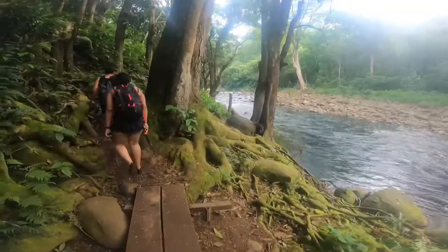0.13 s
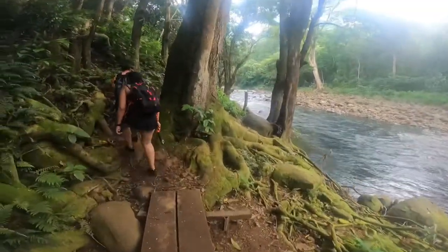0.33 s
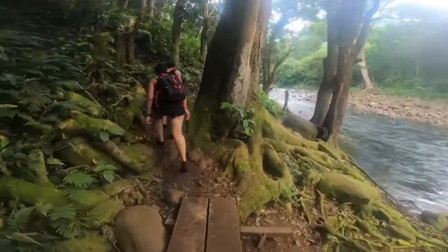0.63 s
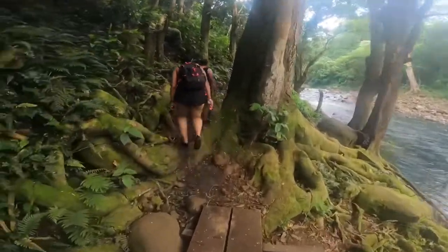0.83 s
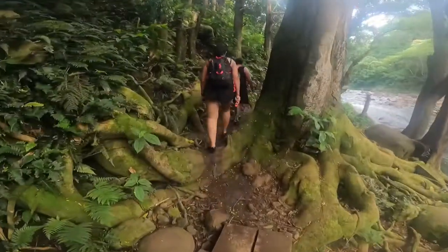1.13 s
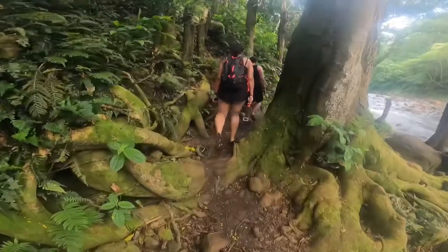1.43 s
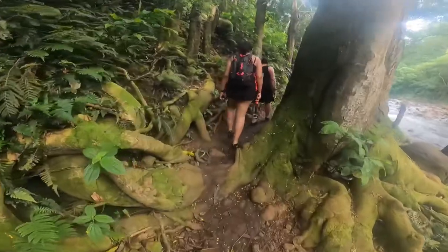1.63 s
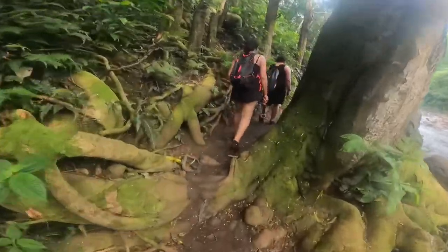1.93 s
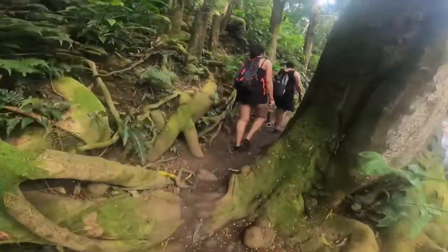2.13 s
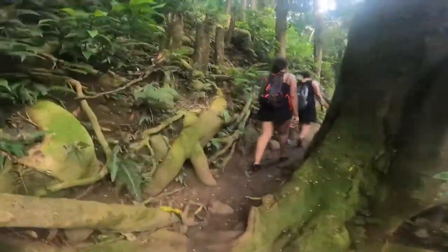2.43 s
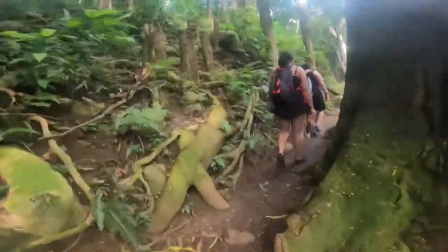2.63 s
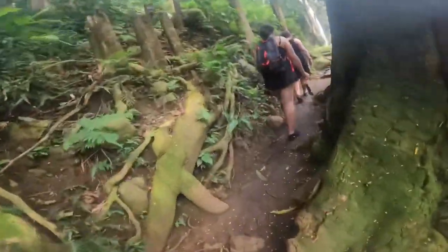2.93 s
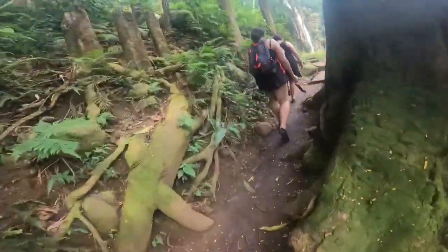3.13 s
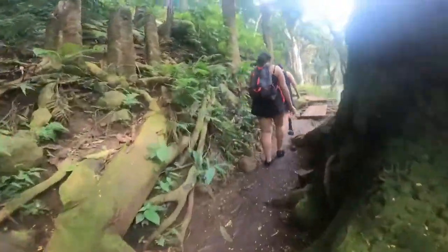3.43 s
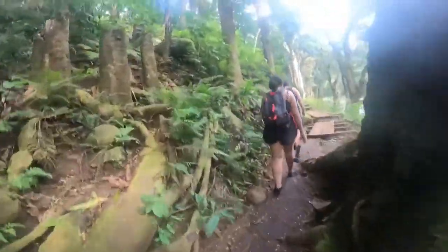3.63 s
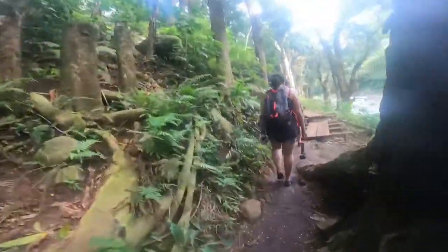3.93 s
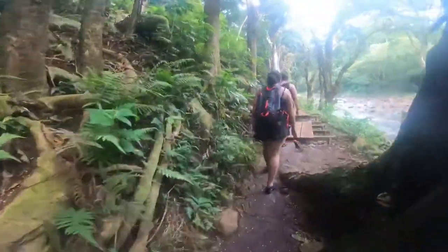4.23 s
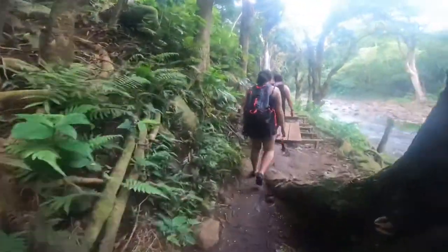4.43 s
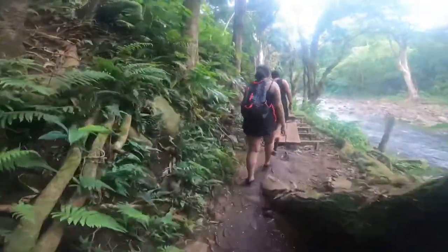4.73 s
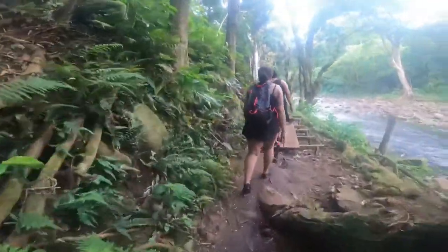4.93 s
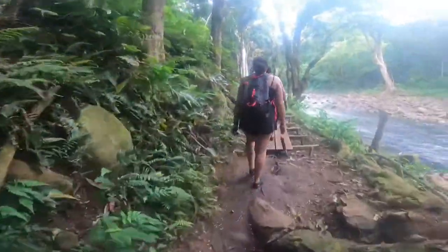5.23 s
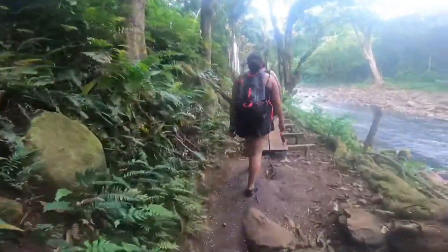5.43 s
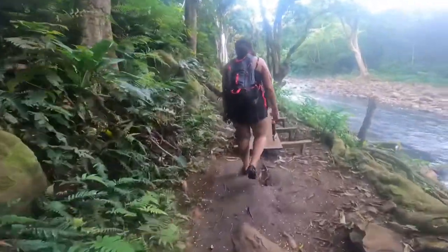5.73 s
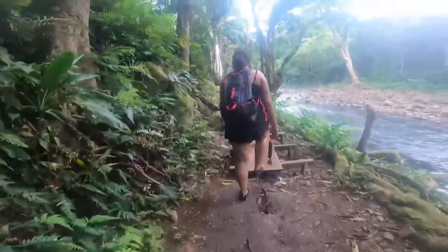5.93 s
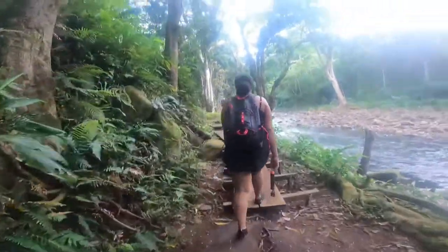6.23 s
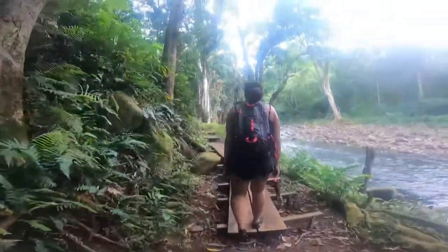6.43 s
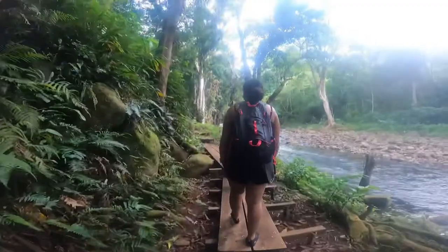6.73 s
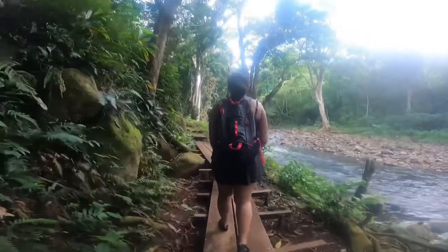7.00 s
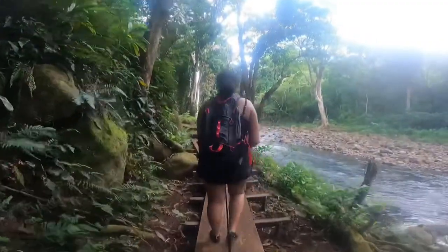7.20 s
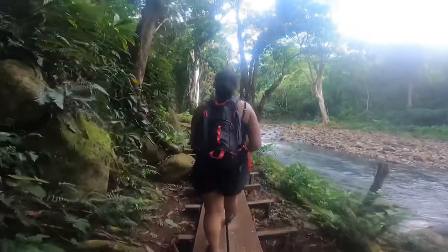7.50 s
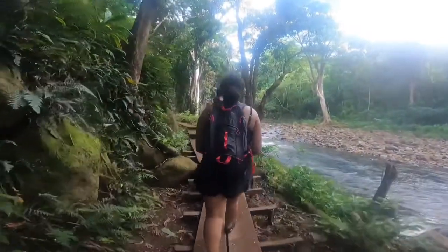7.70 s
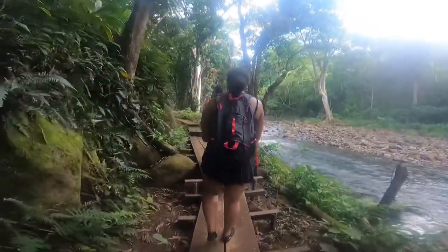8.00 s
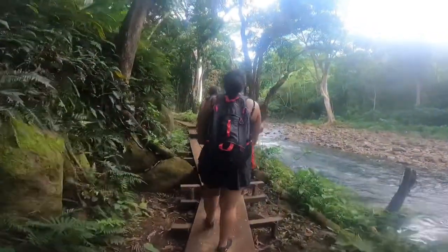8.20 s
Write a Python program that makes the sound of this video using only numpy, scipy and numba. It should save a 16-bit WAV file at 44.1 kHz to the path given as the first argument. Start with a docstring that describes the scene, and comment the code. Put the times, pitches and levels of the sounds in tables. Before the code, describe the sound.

Dull booming footfalls, gritty scrapes and dry clicks of swaying gear over the constant hollow rush of a shallow river, heard through a closed case.

```python
"""Footsteps to a riverside boardwalk, from a carried camera

A hiker walks a dirt path up to a plank boardwalk beside a rushing shallow river, camera in a closed case.
Each footfall jolts the mount, which booms near 120 Hz, and scuffs for as long as the contact lasts.
Gear rubs, clicks, crackles, tinks and squeaks; the deep bass of handling never stops.
The river, noise with splashes and wavering strands, and the scuffs pass the hollow resonances of the case."""
import sys
import numpy as np
from scipy import signal
from scipy.fft import rfft, irfft
from scipy.io import wavfile
from numba import njit

SR = 44100
rng = np.random.default_rng(int(sys.argv[2]) if len(sys.argv) > 2 else 0)


def generate_wav(signal):
    """Clip the signal to [-1, 1] and save it as 16-bit WAV at the path in sys.argv[1]."""
    frames = np.transpose(np.atleast_2d(signal))
    scaled = np.clip(frames, -1, 1) * 32767
    pcm = np.round(scaled).astype(np.int16)
    wavfile.write(sys.argv[1], SR, pcm)


N = 368676
TIME = np.arange(N) / SR
FREQS = np.maximum(np.fft.rfftfreq(N, 1 / SR), 1)

# Footfalls, some landing in two contacts, heel and toe. Each row: start in seconds, length of contact in
# seconds, boom in dB, boom t60 in seconds, boom pitch in Hz, jolt in dB, scuff body in dB, scuff grit in dB.
STEPS = [(0.168, 0.028, -27, 0.17, 110, -26, -48, -47), (0.265, 0.026, -29, 0.063, 116, -19, -36, -38.5),
         (0.325, 0.04, -36.5, 0.087, 113, -14, -67, -45), (0.677, 0.054, -30, 0.18, 124.4, -16, -37, -43.5),
         (1.307, 0.0202, -9, 0.2, 122.6, -18, -20.5, -36), (1.883, 0.031, -24, 0.11, 116.5, -28, -29, -33),
         (2.456, 0.041, -8.5, 0.29, 119.7, -10.5, -32.5, -48), (2.549, 0.05, -18, 0.21, 116, -10, -19, -22),
         (2.603, 0.045, -11, 0.11, 117, -9.5, -19, -28), (2.8, 0.068, -16, 0.18, 124.7, -28, -31, -36.5),
         (2.895, 0.067, -11, 0.25, 123.6, -36, -31.5, -38),
         (3.23, 0.03, -13, 0.1, 119.4, -11.5, -22.5, -31.5),
         (3.263, 0.017, -15, 0.24, 119.5, -3.5, -18, -32.5),
         (3.78, 0.057, -13, 0.092, 121, -13, -22.5, -30.5), (3.96, 0.088, -31.5, 0.19, 123, -42, -44, -61),
         (4.415, 0.05, -28, 0.41, 119.4, -12, -38.5, -50), (4.566, 0.025, -26, 0.094, 108.5, -42, -45, -34),
         (4.838, 0.031, -8.5, 0.16, 110.3, -3.5, -25, -41),
         (4.931, 0.055, -16.5, 0.45, 123.3, -17, -33, -43.5),
         (5.421, 0.062, -24, 0.19, 129, -23.5, -37.5, -34),
         (5.747, 0.02, -14.5, 0.049, 122, -18, -25.5, -35),
         (5.771, 0.043, -13, 0.26, 122.4, -26, -26.5, -30),
         (6.186, 0.075, -20, 0.48, 122.3, -29, -27, -32.5), (6.423, 0.067, -25, 0.51, 114, -31, -32.5, -39),
         (6.733, 0.07, -22.5, 0.34, 116, -34, -30.5, -35), (7.016, 0.028, -22, 0.2, 117.4, -14.5, -27, -37),
         (7.073, 0.035, -24, 0.89, 116.8, -19, -29, -42), (7.333, 0.091, -16, 0.46, 115.7, -40, -46, -69),
         (7.5, 0.053, -31.5, 0.33, 120.6, -45, -47, -52), (7.831, 0.032, -30.5, 0.27, 116, -23, -39, -49),
         (8.282, 0.096, -18, 0.48, 115.3, -19, -27, -35.5)]
# Colour of the fine grit underfoot. Each row: frequency in Hz, relative level in dB per Hz.
GRIT_COLOUR = [(200, -30.5), (450, -10), (760, 3), (980, -2), (1150, -8.5), (1400, -2.5), (1900, -2),
               (2500, -10.5), (3300, -25), (4200, -26), (7200, -36.5), (8300, -55), (9500, -64)]


def thumps(waver=0.025, uneven_db=0.46, loaded_share=0.73, sag_hz=8.4, settle_s=0.033):
    """The weight comes on, the mount swings up and rings out; it starts flat and the grip bends its pitch."""
    out = np.zeros(N)
    grip = 1 + waver * drift(rate_hz=25.0)
    for s, length, boom_db, t60, boom_hz, *_ in STEPS:
        span = slice(int(s * SR), int(s * SR) + SR // 2)
        t = TIME[span] - s
        rise = loaded_share * length  # seconds until the full weight is on the foot
        swell = np.sin(np.pi / 2 * np.clip(t / rise, 0, 1))
        decay = from_db(boom_db - 60 * np.maximum(t - rise, 0) / t60)
        hz = grip[span] * (boom_hz - sag_hz * np.exp(-t / settle_s))
        out[span] += swell * decay * np.sin(2 * np.pi * np.cumsum(hz) / SR)
    return out * from_db(uneven_db * drift(rate_hz=37))


def jolts(cycles=0.56, peak_share=0.539, jolt_hz=61.3, at_boom_db=-17, db_per_octave=14.5):
    """Each contact shoves the camera through one or two slow swings; so does each lurch of the hand."""
    # Lurches between footfalls. Each row: centre in seconds, level in dB, swing rate in Hz.
    lurches = [(2.679, -20, 20), (3.444, -21, 28), (3.514, -19, 17), (4.268, -15, 12), (4.381, -15, 29),
               (4.502, -18.5, 27), (5.288, -21, 10), (5.855, -15, 11.7)]
    shoves = []
    for s, length, boom_db, _, _, jolt_db, *_ in STEPS:
        # a step that booms louder also shoves faster
        swing_hz = jolt_hz * 2 ** ((boom_db - at_boom_db) / db_per_octave)
        shoves.append((s + peak_share * length, jolt_db, swing_hz))
    out = np.zeros(N)
    for s, level_db, hz in shoves + lurches:
        span = slice(max(int(s * SR) - SR // 5, 0), int(s * SR) + SR // 5)
        turn = (TIME[span] - s) * hz
        out[span] += from_db(level_db) * np.exp(-(turn / cycles) ** 2) * np.cos(2 * np.pi * turn)
    return out


def scuffs(sway_db, rough_db=0.2, stir_db=-19, stir_grit_db=-5, stir_spread_db=-2.5, groan_db=-7,
           groan_hz=390, groan_width_hz=45, groan_octaves=0.27, crunch_db=-2):
    """Steps and rubs are bursts of slips, a sliding hollow note under crunchy grit; swaying gear stirs too."""
    # Gear rubs between footfalls. Each row: start in seconds, length in seconds, body in dB, grit in dB.
    rubs = [(0.07, 0.021, -34.5, -35), (0.149, 0.053, -41.5, -40), (0.847, 0.14, -36, -41.5),
            (1.214, 0.15, -36.5, -41), (1.63, 0.072, -40.5, -45), (2.393, 0.034, -38, -43),
            (2.493, 0.02, -27, -30.5), (2.53, 0.02, -22, -28), (2.731, 0.057, -31, -40),
            (3.023, 0.22, -45.5, -44.5), (3.3, 0.044, -34.5, -43), (3.43, 0.037, -35.5, -54),
            (3.5, 0.11, -39, -53), (3.668, 0.023, -56, -40), (3.722, 0.068, -37.5, -49),
            (3.837, 0.037, -35, -44), (3.91, 0.044, -37.5, -52), (4.127, 0.059, -30, -38.5),
            (4.263, 0.064, -33.5, -43), (4.474, 0.068, -54, -39), (4.65, 0.15, -34.5, -40.5),
            (4.899, 0.027, -26, -36.5), (5.04, 0.086, -45, -62), (5.884, 0.013, -35.5, -47),
            (6.132, 0.055, -35, -41), (6.288, 0.054, -37, -39.5), (6.497, 0.084, -40.5, -60),
            (7.502, 0.094, -36, -49.5)]
    # Colour of the scuff's body. Each row: frequency in Hz, relative level in dB per Hz.
    body_colour = [(70, 8.5), (130, 3.5), (200, 0), (265, -2.5), (335, 3.5), (420, 5.5), (520, -4),
                   (640, -18.5), (900, -46.5), (4000, -86.5)]
    stir = from_db(sway_db + stir_db + stir_spread_db * np.minimum(drift(rate_hz=4.5), 2)) ** 2
    contacts = [(s, length, body_db, grit_db) for s, length, *_, body_db, grit_db in STEPS] + rubs
    body_rows = [(s, length, db) for s, length, db, _ in contacts]
    grit_rows = [(s, length, db) for s, length, _, db in contacts]
    body_power = stir + contact_power(body_rows, attack_s=0.0064, release_s=0.0095)
    grit_power = contact_power(grit_rows, attack_s=0.0094, release_s=0.0084)
    grit_power = grit_power + stir * from_db(stir_grit_db) ** 2

    sliding_hz = groan_hz * 2 ** (groan_octaves * drift(rate_hz=11.3))
    groan = moving_resonance(rng.standard_normal(N), sliding_hz, groan_width_hz)
    groan = rms_one(ring_at(groan, groan_hz, width_hz=230))
    groan = from_db(groan_db) * groan * from_db([[-1.5], [1.5]])  # a little louder on the right
    body = rms_one(case(coloured(grains(per_s=1100, spread_db=2.5), body_colour)))
    hollow = rms_one(body + groan)

    fine = rms_one(grains(per_s=2200, spread_db=0.0))
    crunches = rms_one(grains(per_s=190, spread_db=0.0))
    gritty = rms_one(case(coloured(fine + from_db(crunch_db) * crunches, GRIT_COLOUR)))
    pressure = from_db(rough_db * drift(rate_hz=42))
    return pressure * (np.sqrt(body_power) * hollow + np.sqrt(grit_power) * gritty)


def clicks(crumble_s=0.0026, crumble=0.068, uneven_db=5.0, focus_db_per_octave=16, crack_db=-5,
           crack_octaves=0.65, splinter_db=-8, splinter_low_hz=1700, splinter_top_hz=6000,
           dull_hz=6500, knock_lag_s=0.0012):
    """A dry snap and its brief crumbling ring nearby modes, with a hollow knock and a splintering edge."""
    # Clicks and knocks of shoes and gear, levels as peaks ahead of the dulling. Each row: start in seconds,
    # snap in dB, strongest ringing in Hz, hollow knock in dB, knock pitch in Hz, crisp edge in dB.
    snaps = [(0.404, -19.5, 1280, -68, 450, -61), (0.692, -24, 1140, -26, 430, -43),
             (1.3075, -15.5, 1250, -20, 450, -29.5), (1.324, -27, 1700, -22, 340, -38),
             (1.417, -27.5, 1130, -56, 450, -56), (2.551, -14, 1600, -28, 450, -40),
             (2.566, -14, 1250, -27, 500, -38), (2.578, -14, 1060, -16, 450, -38),
             (2.6126, -14, 1220, -19, 330, -36), (2.637, -24, 1500, -19, 400, -40),
             (2.817, -25.5, 1730, -36, 450, -44), (2.963, -23, 1410, -38, 450, -44),
             (3.099, -24, 1430, -39, 450, -39), (3.253, -35, 1800, -30, 450, -44),
             (3.265, -34, 1300, -14.5, 330, -45), (3.62, -23.5, 1120, -48, 400, -41),
             (3.662, -23, 1300, -50, 450, -37), (3.674, -25.5, 1220, -45, 450, -39),
             (3.737, -27, 1610, -44, 450, -33), (4.47, -21, 1380, -29, 550, -44),
             (4.477, -19.5, 1140, -35, 550, -38), (4.491, -15, 1310, -39, 520, -28),
             (4.561, -25, 1470, -46, 480, -44), (4.58, -23, 1110, -47, 480, -48),
             (4.595, -32, 1090, -44, 480, -50), (4.7757, -21, 1780, -30, 500, -26.5),
             (4.777, -14.5, 880, -17, 620, -31), (4.841, -41, 1110, -15, 453, -50),
             (4.852, -28, 1080, -10.5, 423, -40), (4.861, -28, 1060, -16, 440, -35),
             (4.912, -21, 1500, -36, 400, -33), (5.368, -16.5, 1070, -38, 450, -46),
             (5.39, -24, 1490, -41, 450, -44), (5.453, -16, 1250, -35, 450, -34),
             (5.664, -26.5, 1570, -53, 448, -33), (6.194, -19, 1550, -31, 550, -45),
             (6.229, -18, 1050, -30, 450, -48), (6.319, -27, 1610, -37, 450, -48),
             (7.034, -34, 1500, -30, 420, -34), (7.3336, -15.5, 1330, -31, 560, -51),
             (7.337, -21, 1000, -19.5, 570, -60)]
    # What the clicks ring with. Each row: frequency in Hz, relative strength in dB, t60 in seconds.
    modes = [(211, 9.5, 0.016), (350, -12.5, 0.023), (463, -1, 0.028), (536, -1.5, 0.016),
             (598, -5, 0.0096), (900, -3, 0.0078), (966, 4.5, 0.014), (1148, 2.5, 0.011), (1300, -5, 0.01),
             (1594, 0.5, 0.015), (1850, -2.5, 0.006)]
    t = TIME[:SR // 16]
    out = np.zeros((2, N))
    hz, mode_db, t60 = np.transpose(modes)[:, :, None]
    low = hz[:, 0] < 750  # these modes make the hollow knock
    opposed = (-1) ** np.arange(len(hz))[:, None]  # neighbouring modes swing in opposition
    tap = signal.unit_impulse(len(t))
    splinter = band_pass(tap, [splinter_low_hz, splinter_top_hz])
    edge = rms_one(crisp(tap)) + from_db(splinter_db) * rms_one(splinter)
    for s, peak_db, ring_hz, low_db, low_hz, edge_db in snaps:
        force = tap + crumble * rng.standard_normal(len(t)) * np.exp(-t / crumble_s)
        octaves_away = np.abs(np.log2(hz / np.where(low[:, None], low_hz, ring_hz)))
        # each microphone gets every mode with a strength of its own
        uneven = uneven_db * rng.standard_normal((2, len(hz), 1))
        strength = from_db(mode_db - focus_db_per_octave * octaves_away + uneven) * opposed
        rings = strength * from_db(-60 * t / t60) * np.sin(2 * np.pi * hz * t)
        crack = band_pass(tap, ring_hz * 2 ** (crack_octaves * np.array([-0.5, 0.5])))
        parts = [(rings[:, ~low].sum(axis=1), peak_db, 0),
                 (rings[:, low].sum(axis=1), low_db, knock_lag_s),
                 (crack[None], peak_db + crack_db, 0),
                 (edge[None], edge_db, 0)]
        for response, db, lag in parts:
            hit = signal.fftconvolve(response, force[None])[:, :len(t)]
            start = int((s + lag) * SR)
            out[:, start:start + len(t)] += from_db(db) * hit / np.abs(hit).max()
    return signal.sosfilt(signal.butter(4, dull_hz, fs=SR, output="sos"), out + 1e-18)


def crackles():
    """As gear flexes under a heavy step, runs of tiny snaps ring, a little different at each microphone."""
    # Each row: start in seconds, length in seconds, level in dB.
    runs = [(1.315, 0.024, -47), (2.555, 0.079, -42), (2.74, 0.14, -55), (2.882, 0.039, -44),
            (2.915, .05, -55), (3.24, 0.05, -57), (3.775, 0.048, -44.5), (4.911, 0.01, -37.5)]
    snaps = rms_one(crisp(coloured(grains(per_s=1000, spread_db=-1.5), GRIT_COLOUR)))
    return snaps * np.sqrt(contact_power(runs, attack_s=0.004, release_s=0.0072))


def soft_knock(start_s=5.572, level_db=-29.5, from_hz=1150, to_hz=110, drop_s=0.0016, peak_s=0.0038):
    """A few cycles that swell and die while sweeping down into the bass."""
    out = np.zeros(N)
    t = TIME[:SR // 16]
    hz = to_hz + (from_hz - to_hz) * np.exp(-t / drop_s)
    swell = t / peak_s * np.exp(1 - t / peak_s)
    start = int(start_s * SR)
    out[start:start + len(t)] = from_db(level_db) * swell * np.sin(2 * np.pi * np.cumsum(hz) / SR)
    return out


def tinks():
    """A small piece of metal, as of a zip pull, swings against the pack and rings in decaying modes."""
    # Each row: start in seconds, level in dB, to which the level of each mode is added.
    touches = [(0.729, -67), (.757, -77), (3.62, -60), (6.379, -64)]
    # Each row: frequency in Hz, relative level in dB, t60 in seconds.
    metal_modes = [(5700, 19, 0.034), (5360, 7, 0.022), (5820, 12, 0.043), (6230, 4, 0.029),
                   (7160, 4, 0.04), (8700, -17, .12)]
    out = np.zeros(N)
    t = TIME[:SR // 4]
    ring = sum(from_db(db - 60 * t / t60) * np.sin(2 * np.pi * hz * t) for hz, db, t60 in metal_modes)
    for s, level_db in touches:
        start = int(s * SR)
        out[start:start + len(t)] += from_db(level_db) * ring
    return out


def squeak(start_s=7.06, length_s=0.12, level_db=-49, from_hz=1850, to_hz=2000, width_hz=70):
    """Two surfaces of the gear slip and sing thinly for a moment, rising in pitch."""
    hz = np.interp(TIME, [start_s, start_s + length_s], [from_hz, to_hz])
    note = rms_one(narrow_note(hz, width_hz))
    return note * np.sqrt(contact_power([(start_s, length_s, level_db)], attack_s=0.015, release_s=0.012))


def rumble(level_db, lumpy_db=4.5, boom_db=-11.0, boom_hz=117, boom_width_hz=34):
    """The carried camera never rests: lumpy bass keeps the mount humming, the same in both channels."""
    # Colour of the handling bass. Each row: frequency in Hz, relative level in dB per Hz.
    bass_colour = [(12, 9.5), (28, 9.5), (45, -5), (80, -4.5), (130, -13), (220, -47), (400, -62),
                   (2000, -110)]
    bass = irfft(rfft(rng.standard_normal(N)) * from_db(at_freqs(bass_colour)), N)
    b, a = signal.iirpeak(boom_hz, boom_hz / boom_width_hz, fs=SR)
    hum = signal.lfilter(b, a, signal.lfilter(b, a, rng.standard_normal(N)))
    lumps = from_db(level_db + lumpy_db * np.minimum(drift(rate_hz=10.7), 1))
    return lumps * (rms_one(bass) + from_db(boom_db) * rms_one(hum))


def river(level_db, flutter_db=0.5, splash_db=-9, murmur_top_hz=900, surge_db=1.2, gurgle_db=0.44):
    """A smooth rush with countless small splashes, surging low mids and hollow notes that waver and gurgle."""
    # Colour behind the case wall. Each row: frequency in Hz, relative level in dB per Hz.
    water_colour = [(100, 7.5), (220, 4), (650, 0), (1500, -2), (2400, 1.5), (3400, -6), (4500, -5.5),
                    (6000, -16), (7300, -19), (8300, -31.5), (10000, -35)]
    # Low mids against the rest along the walk. Each row: time in seconds, mean gain in dB.
    murmur_curve = [(0.0, -2.5), (.35, -3.5), (.6, -3.5), (.85, -0.5), (1.9, 1), (2.17, -3.5), (2.45, 0),
                    (4.9, 2), (5.2, -2.5), (5.5, 0.5), (8.36, 0)]
    # Centre of the hollow note, wavering along the walk. Each row: time in seconds, frequency in Hz.
    hollow_curve = [(0.02, 1135), (1.64, 1125), (1.82, 1158), (2.14, 1107), (2.68, 1151), (3.09, 1117),
                    (3.22, 1240), (3.4, 1143), (4.24, 1164), (4.62, 1176), (5.25, 1159), (5.4, 1140),
                    (5.54, 1216), (6.28, 1085), (6.48, 1196), (6.79, 1154), (8.34, 1142)]
    # Wavering strands. Each row: multiple of the hollow note, width in Hz, waver in octaves, level in dB.
    strands = [(1.001, 60.5, 0.058, -5.7), (1.46, 69.7, .07, -19.5), (2.62, 111, 0.042, -15.5)]
    splashes = rms_one(grains(per_s=1600, spread_db=5.5))
    water = rms_one(rng.standard_normal((2, N))) + from_db(splash_db) * splashes
    water = rms_one(case(coloured(water, water_colour)))
    murmur = irfft(rfft(water) / (1 + (FREQS / murmur_top_hz) ** 8), N)
    surge = from_db(np.interp(TIME, *np.transpose(murmur_curve)) + surge_db * drift(rate_hz=5))
    centre_hz = np.interp(TIME, *np.transpose(hollow_curve))
    notes = 0
    for multiple, width_hz, octaves, db in strands:
        hz = multiple * centre_hz * 2 ** (octaves * drift(rate_hz=10.4))
        gurgle = from_db(db + gurgle_db * drift(rate_hz=9.8))
        notes = notes + gurgle * rms_one(narrow_note(hz, width_hz))
    notes = notes * from_db([[1.8], [-1.8]])  # a little louder on the left
    level = from_db(level_db + flutter_db * drift(rate_hz=7.9))
    return level * (water + (surge - 1) * murmur + notes)


def case(pair):
    """Each resonance of the case lifts or cuts a narrow band, differently at each microphone."""
    # Each row: frequency in Hz, width in Hz, gain at the left microphone in dB, at the right in dB.
    resonances = [(397, 99, 2, 3), (523.7, 36.4, 6, 13), (970, 59, 6.5, 6), (1160.6, 105, 17.5, 16),
                  (1664, 157, 8.5, 4.5), (3028, 253, 14, 8), (3824, 71, 1, 8.5), (5770, 660, 3, 4.5),
                  (7900, 72, 11, -27)]
    for hz, width_hz, left_db, right_db in resonances:
        extra = from_db([[left_db], [right_db]]) - 1
        pair = pair + extra * ring_at(pair, hz, width_hz)
    return pair


def coloured(pair, spectrum):
    """Two unrelated signals become a left and right channel of the given colour, partly alike."""
    # Likeness of the two microphones. Each row: frequency in Hz, correlation from -1 to 1.
    likeness = [(140, 0.91), (250, 0.58), (390, 0.67), (520, -0.21), (680, 0.5), (900, 0.5), (1130, 1),
                (1400, 0.72), (1700, 0.7), (2000, 0.49), (2400, -0.79), (2900, 0.72), (4100, 0.53),
                (5600, 0.76)]
    mid, side = rfft(pair) * from_db(at_freqs(spectrum))
    alike = np.clip(at_freqs(likeness), -0.999, 0.999)
    return irfft(np.sqrt(1 + alike) * mid + np.sqrt(1 - alike) * side * [[1], [-1]], N)


def grains(per_s, spread_db):
    """Two trains of tiny impulses of uneven size at random moments, for slips or splashes."""
    sizes = from_db(spread_db * np.minimum(rng.exponential(1, N), 3))
    return rng.uniform(-1.09, 1, (2, N)) * sizes * (rng.random(N) < per_s / SR)


def contact_power(rows, attack_s, release_s):
    """Power over time of soft-edged contacts given as (start s, length s, dB)."""
    power = np.zeros(N)
    for s, length, level_db in rows:
        span = slice(max(int(s * SR) - SR // 12, 0), int(s * SR) + SR // 3)
        t = TIME[span] - s
        onset = (1 + np.tanh(t / attack_s)) / 2
        ending = (1 - np.tanh((t - length) / release_s)) / 2
        power[span] += onset * ending * from_db(level_db) ** 2
    return power


@njit
def moving_resonance(x, hz, width_hz):
    """A two-pole band-pass whose centre follows a curve."""
    r = np.exp(-np.pi * width_hz / SR)
    y = np.zeros(len(x))
    for i in range(2, len(x)):
        turn = 2 * r * np.cos(2 * np.pi * hz[i] / SR)
        y[i] = x[i] - x[i - 2] + turn * y[i - 1] - r * r * y[i - 2]
    return y


def narrow_note(hz, width_hz):
    """Noise passed twice through a moving resonance becomes a breathy note."""
    once = moving_resonance(rng.standard_normal(N), hz, width_hz)
    return moving_resonance(once, hz, width_hz)


def ring_at(x, hz, width_hz):
    """One steady resonance."""
    b, a = signal.iirpeak(hz, hz / width_hz, fs=SR)
    return signal.lfilter(b, a, x + 1e-18)  # the tiny offset keeps the filter out of denormal numbers


def crisp(x, hz=3306, width_hz=530):
    """The bright, brittle resonance of the gear."""
    return ring_at(ring_at(x, hz, width_hz), hz, width_hz)


def band_pass(x, edges_hz):
    """Keep the band between two edges."""
    return signal.sosfilt(signal.butter(3, edges_hz, "band", fs=SR, output="sos"), x)


def drift(rate_hz):
    """Slow random wander of spread 1: noise smoothed twice, at every 32nd sample."""
    r = np.exp(-64 * np.pi * rate_hz / SR)
    noise = rng.standard_normal(N // 32 + 2002)
    slow = signal.lfilter([1], [1, -2 * r, r * r], noise)[2000:]  # leave out the run-in
    return np.interp(np.arange(N) / 32, np.arange(len(slow)), rms_one(slow))


def at_freqs(points):
    """Read a (Hz, value) table on a log-frequency axis."""
    hz, value = np.transpose(points)
    return np.interp(np.log(FREQS), np.log(hz), value)


def from_db(db):
    """Decibels to gain."""
    return 10 ** (np.asarray(db) / 20)


def rms_one(x):
    """Scale to unit power."""
    return x / np.sqrt(np.mean(x ** 2) + 1e-20)


def scene(river_over_treble_db=7, rumble_over_floor_db=2.5):
    """Booms, jolts and rumble reach both microphones alike; river and scuffs come through the case."""
    # The river's treble along the path. Each row: time in seconds, level in dB.
    rush_curve = [(0.0, -46.5), (0.51, -46), (1.72, -47.5), (2.84, -49), (3.21, -50), (4.31, -46.5),
                  (5.08, -46.5), (8.15, -46), (8.36, -43)]
    # Floor of the deep bass between the steps. Each row: time in seconds, level in dB.
    sway_curve = [(0.0, -39), (.2, -34.5), (0.54, -40), (0.75, -34), (1.35, -30.5), (1.6, -42), (1.9, -32),
                  (2.13, -40), (2.4, -38), (2.65, -33.5), (3.1, -29), (3.6, -31), (3.93, -34), (4.35, -27),
                  (4.62, -41), (4.8, -25.5), (5.3, -33), (5.65, -41), (5.92, -30), (6.08, -38.5),
                  (6.45, -34), (6.669, -39), (7.01, -35), (7.27, -39.5), (7.47, -39), (7.62, -34),
                  (8.12, -46.5), (8.36, -22)]
    rush_db = np.interp(TIME, *np.transpose(rush_curve))
    sway_db = np.interp(TIME, *np.transpose(sway_curve))
    footfalls = thumps() + jolts() + scuffs(sway_db)
    gear = crackles() + clicks() + soft_knock() + tinks() + squeak()
    handling = rumble(sway_db + rumble_over_floor_db)
    water = river(rush_db + river_over_treble_db)
    return footfalls + gear + handling + water


def record(dry, cutoff_hz=9600):
    """The top is cut steeply."""
    return signal.sosfilt(signal.butter(12, cutoff_hz, fs=SR, output="sos"), dry)


dry = scene()
out = record(dry)
generate_wav(out)
```